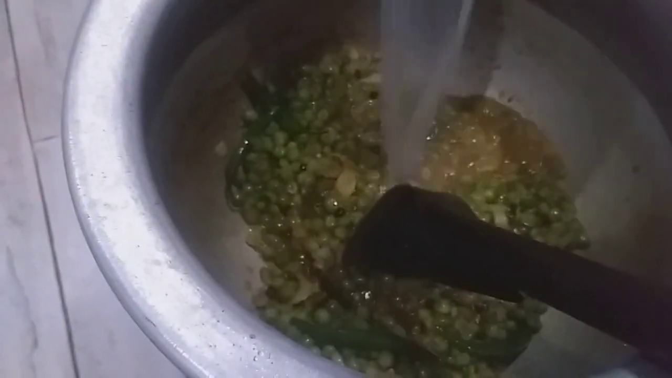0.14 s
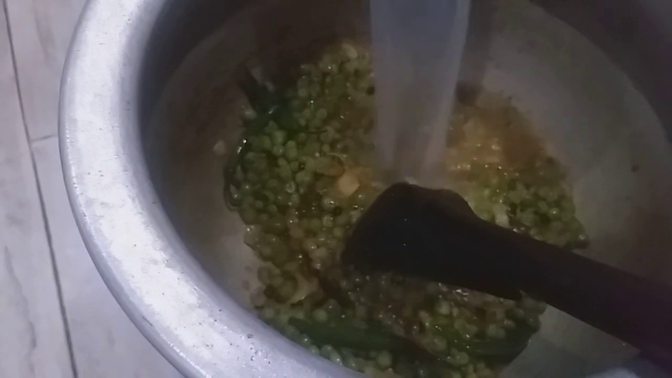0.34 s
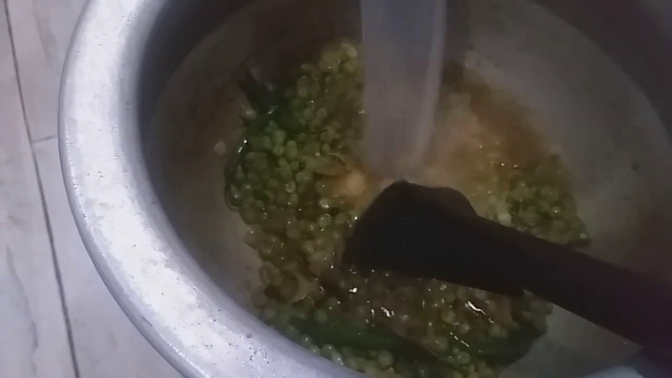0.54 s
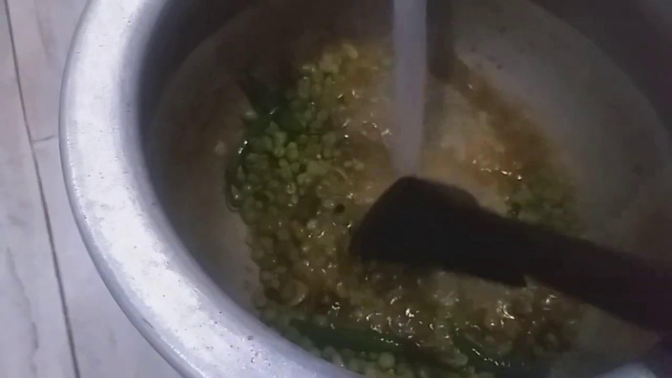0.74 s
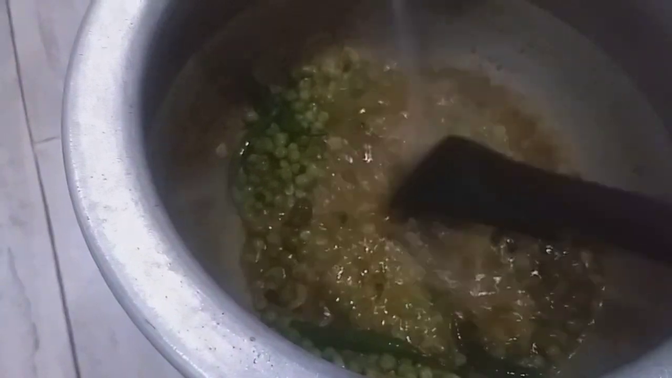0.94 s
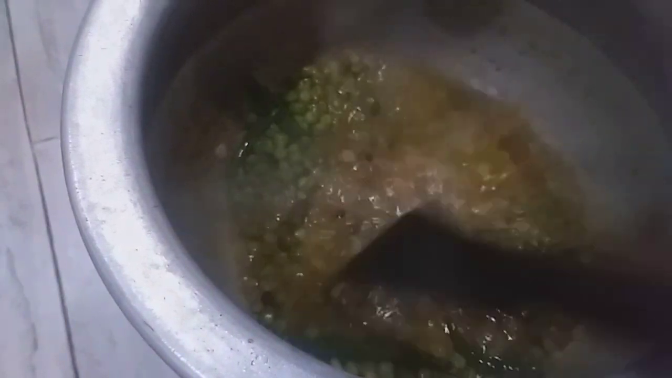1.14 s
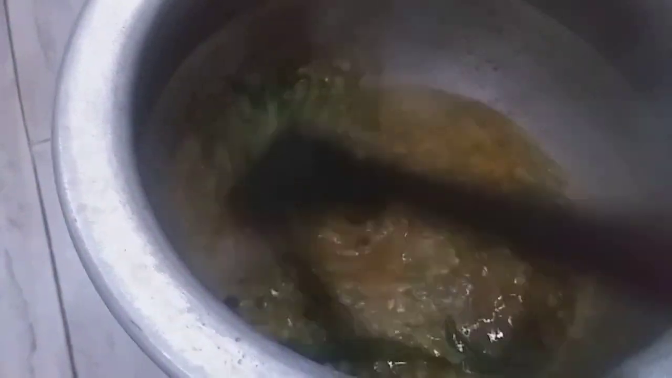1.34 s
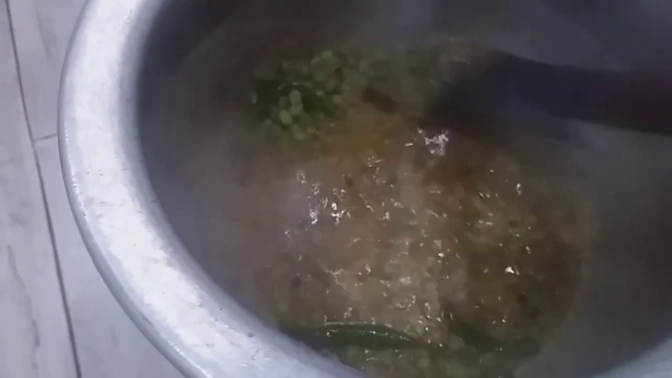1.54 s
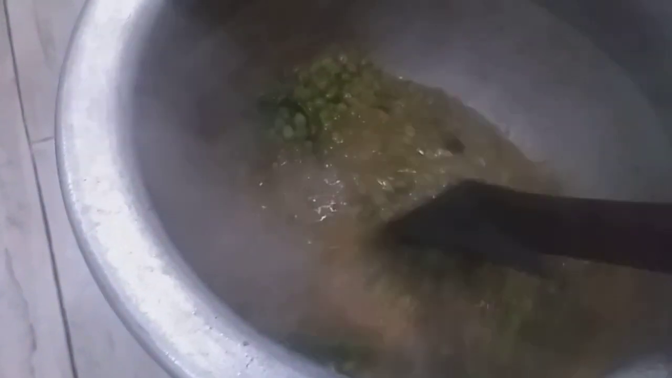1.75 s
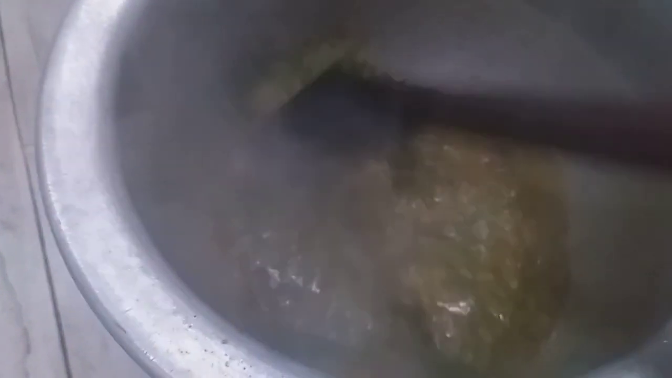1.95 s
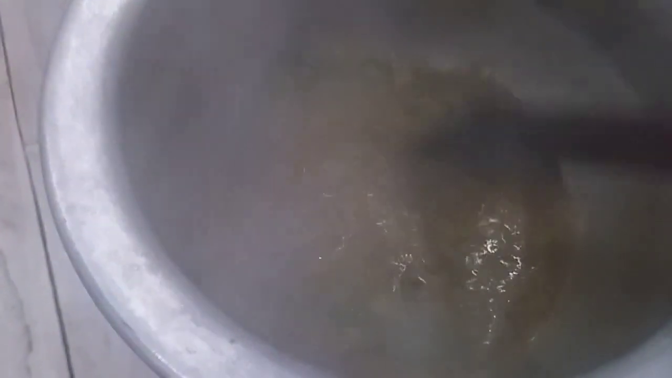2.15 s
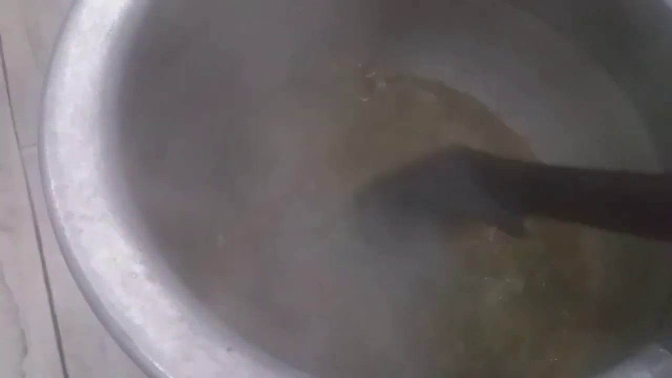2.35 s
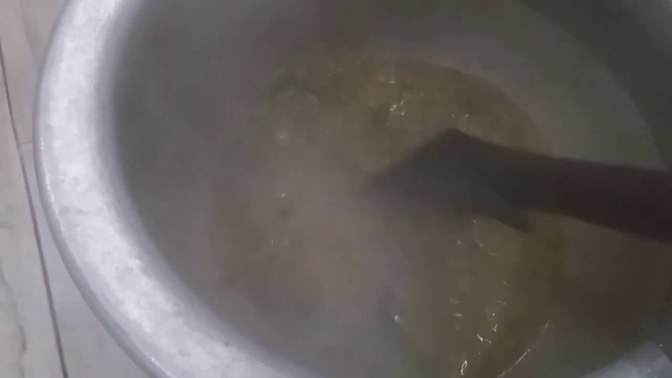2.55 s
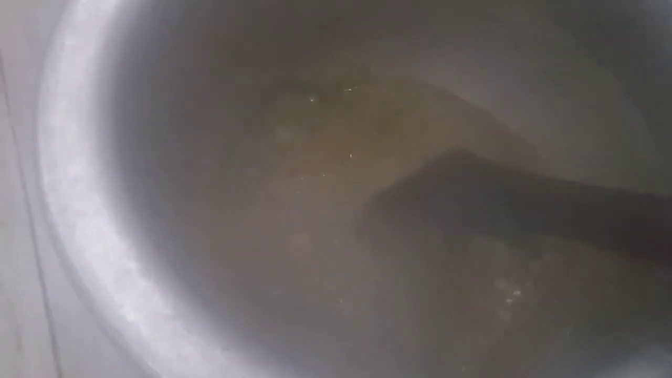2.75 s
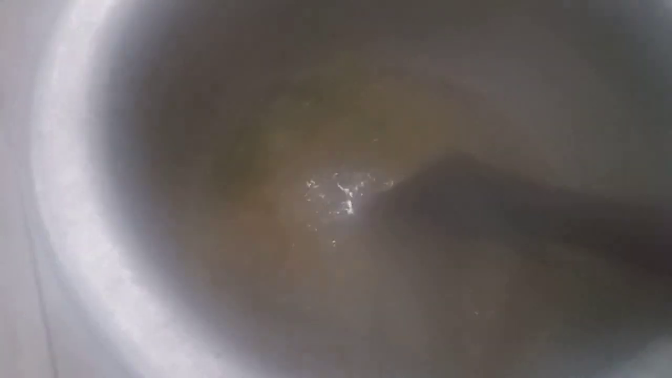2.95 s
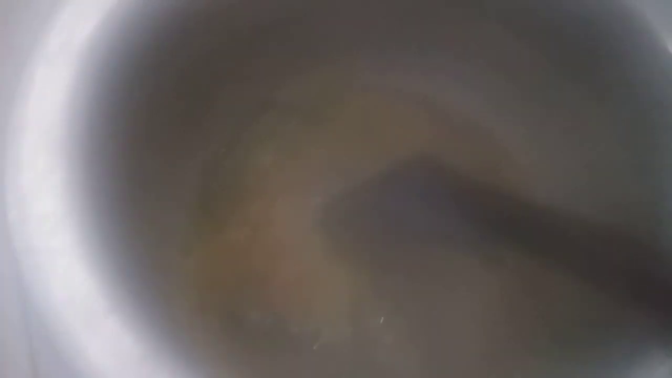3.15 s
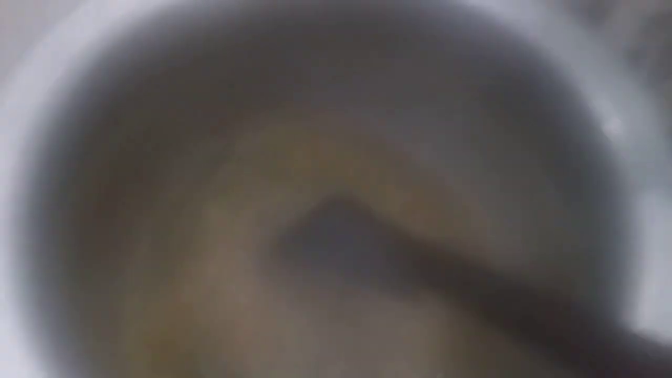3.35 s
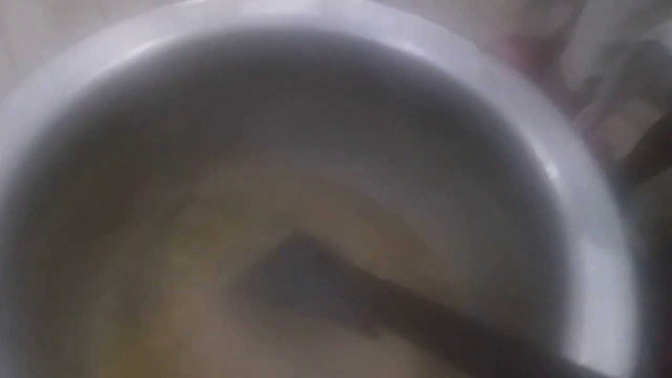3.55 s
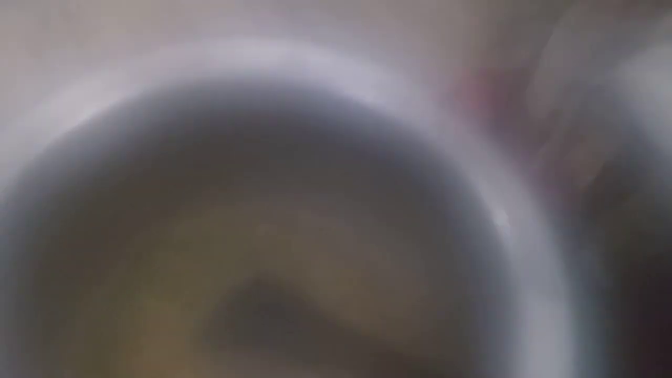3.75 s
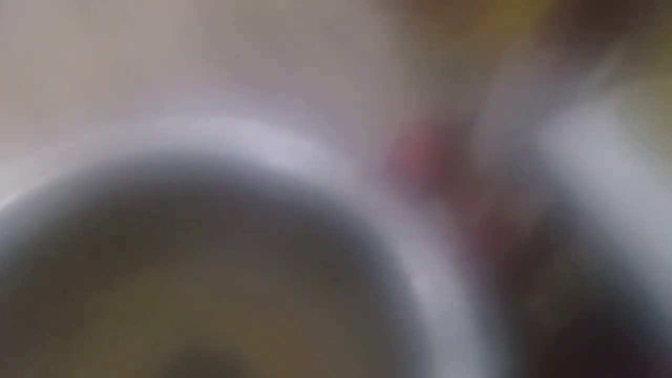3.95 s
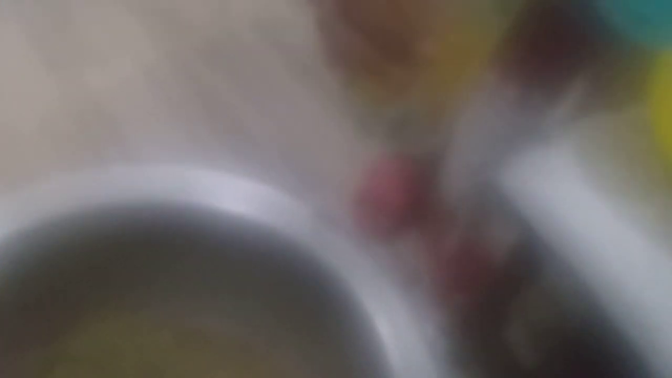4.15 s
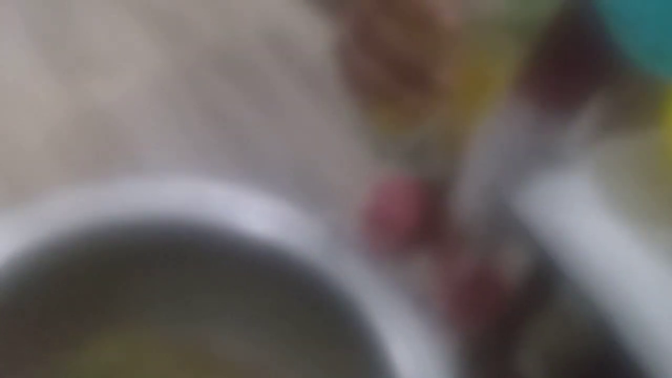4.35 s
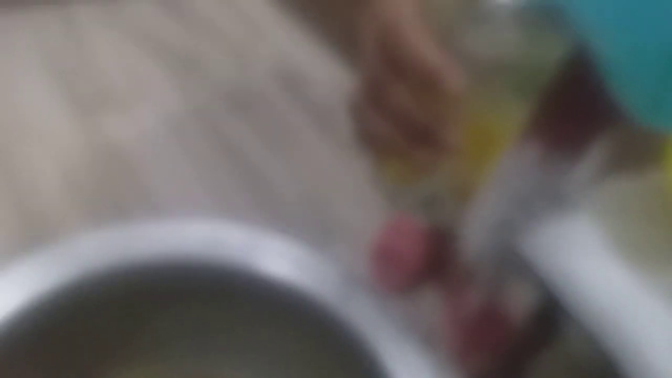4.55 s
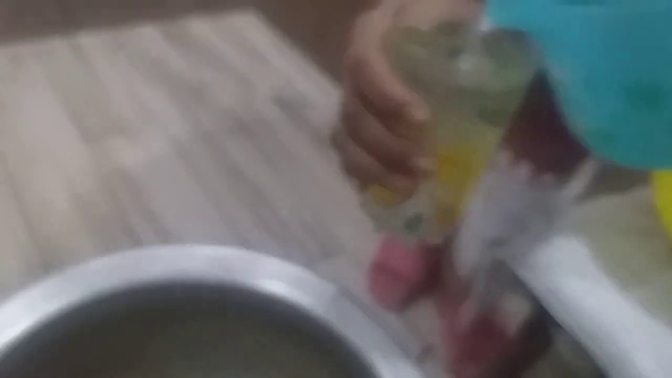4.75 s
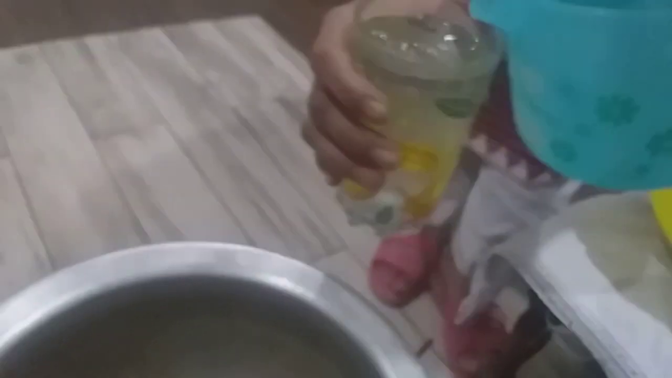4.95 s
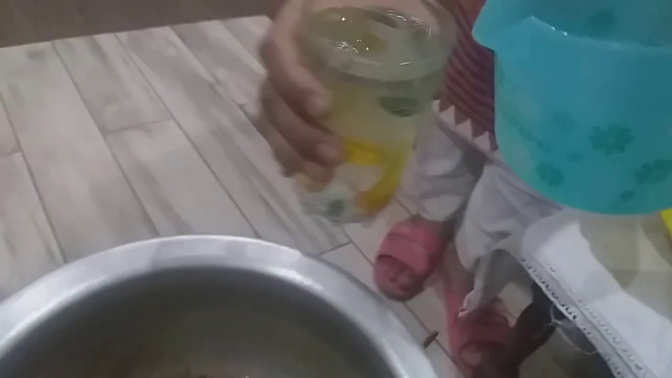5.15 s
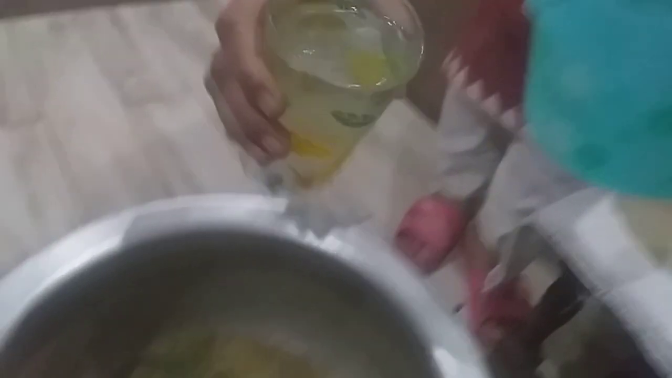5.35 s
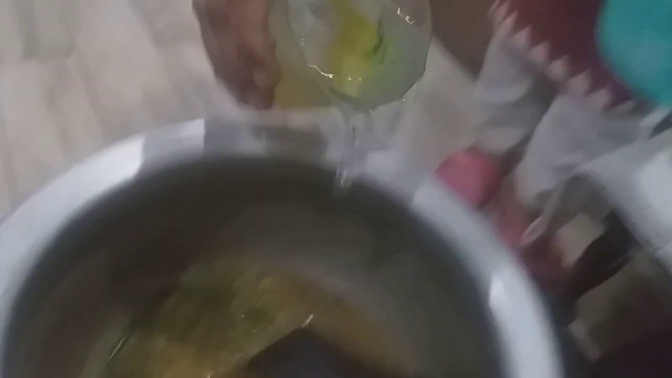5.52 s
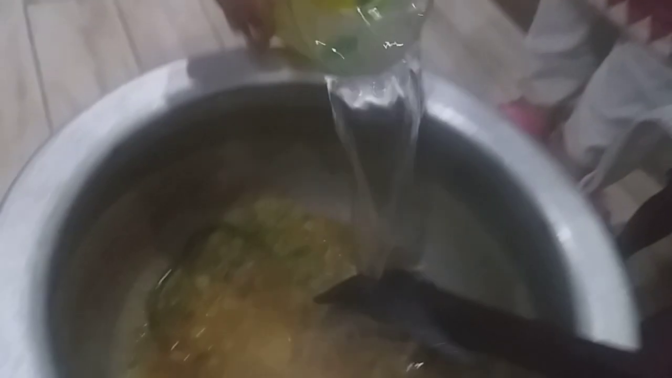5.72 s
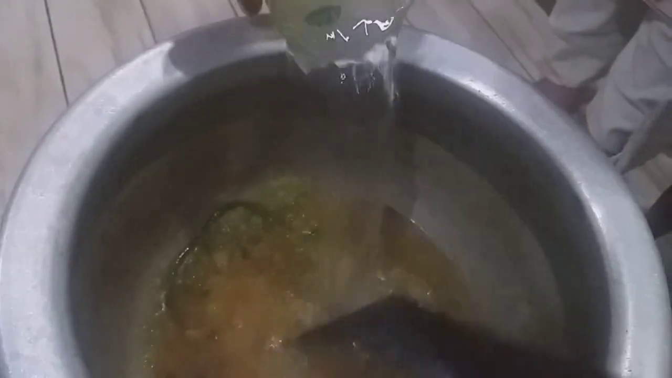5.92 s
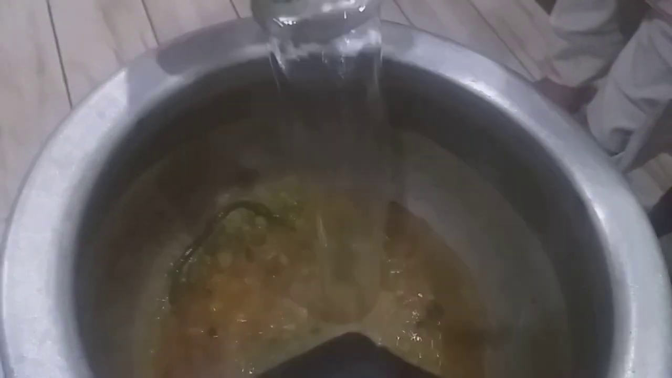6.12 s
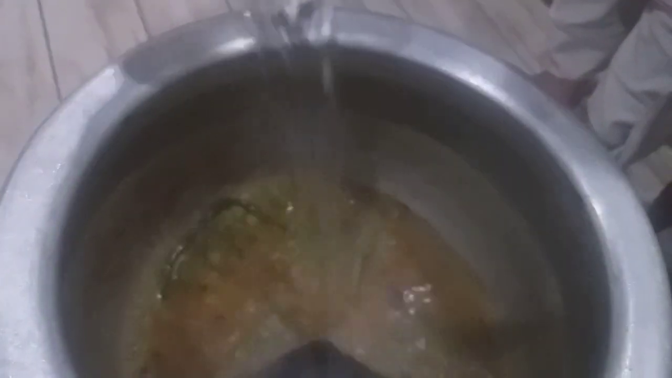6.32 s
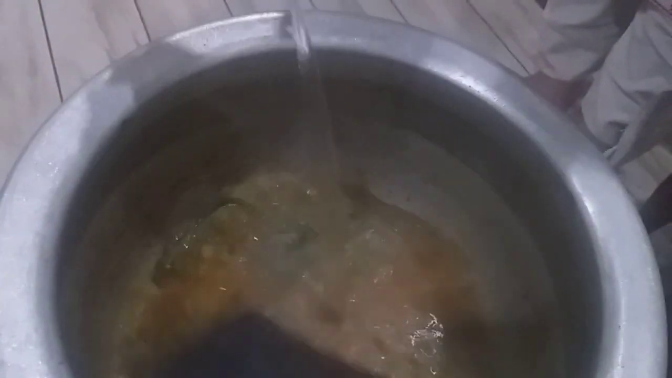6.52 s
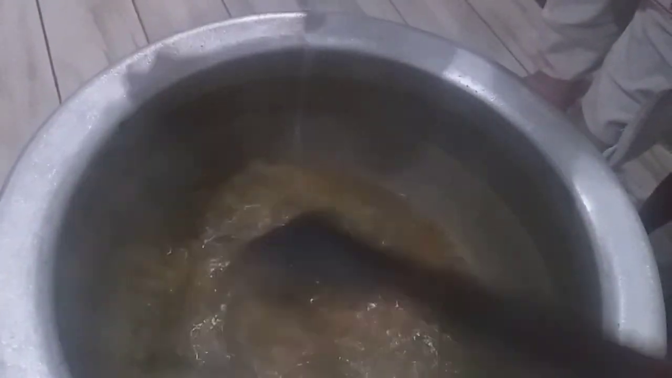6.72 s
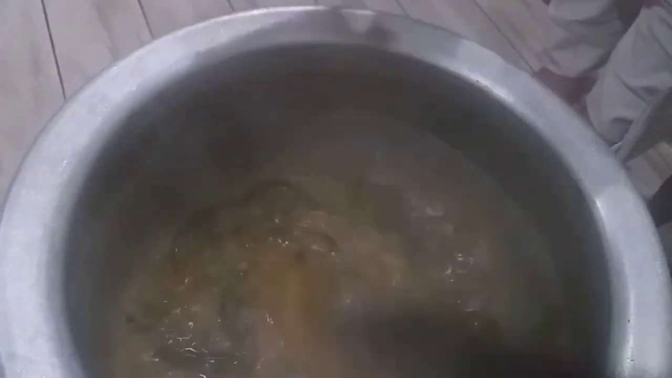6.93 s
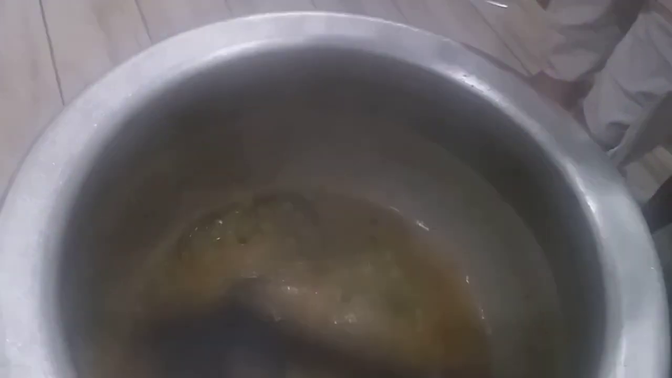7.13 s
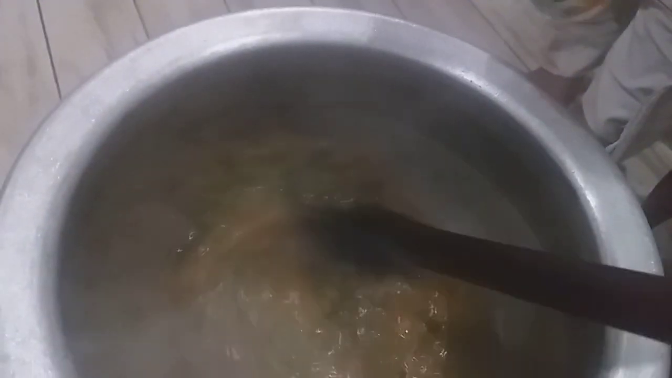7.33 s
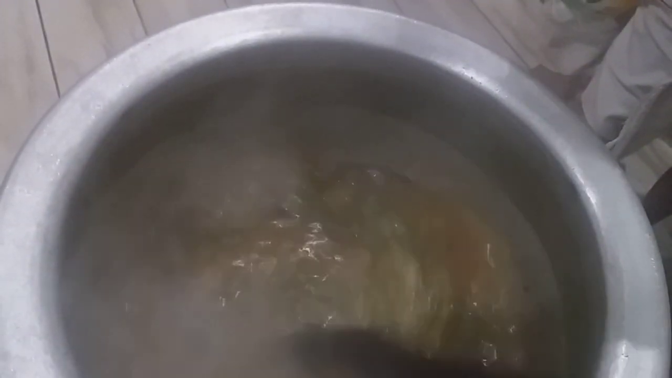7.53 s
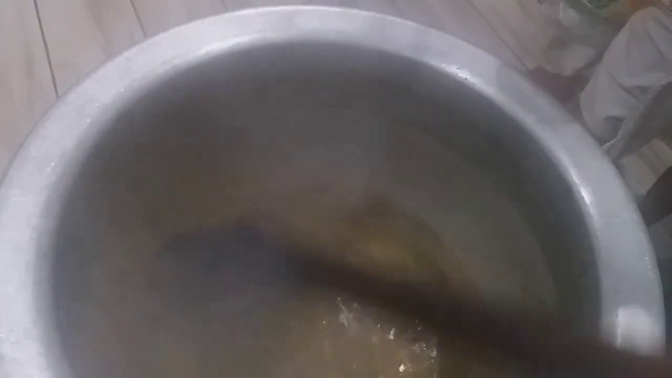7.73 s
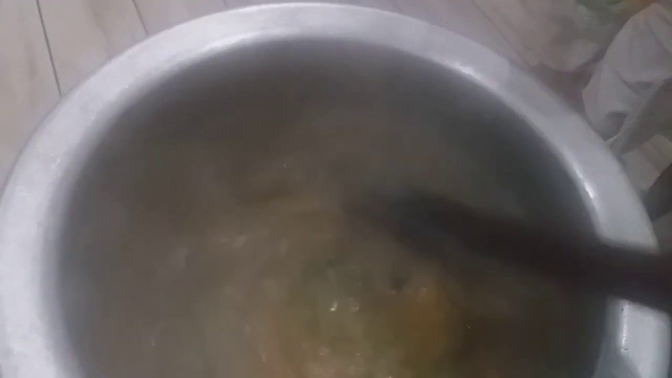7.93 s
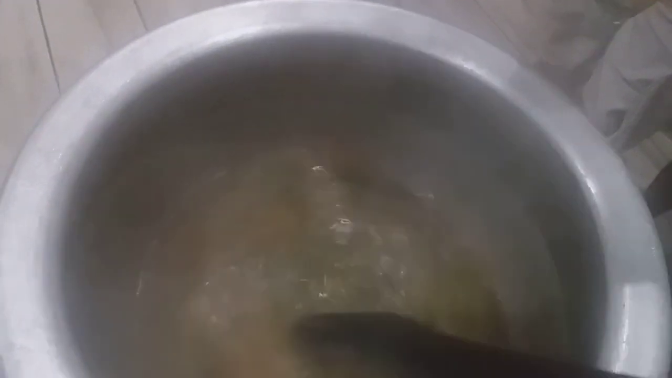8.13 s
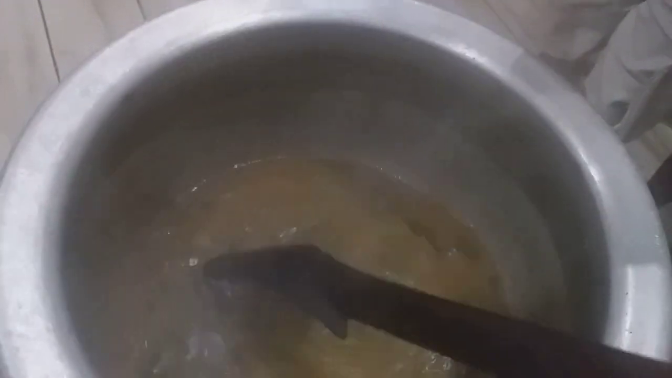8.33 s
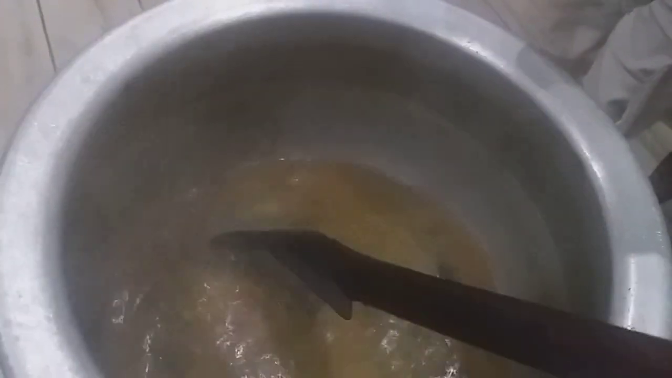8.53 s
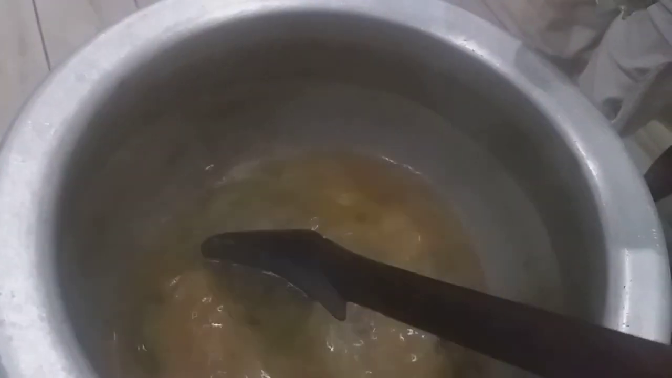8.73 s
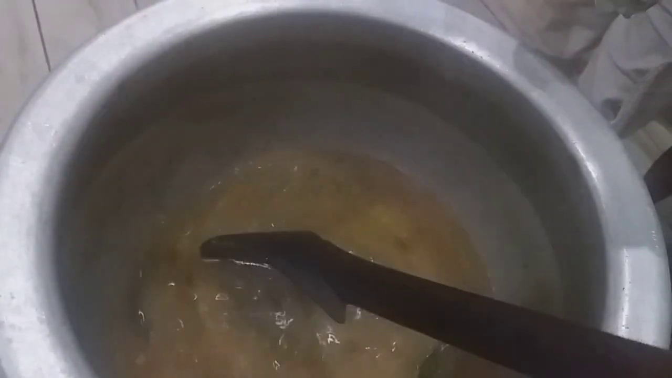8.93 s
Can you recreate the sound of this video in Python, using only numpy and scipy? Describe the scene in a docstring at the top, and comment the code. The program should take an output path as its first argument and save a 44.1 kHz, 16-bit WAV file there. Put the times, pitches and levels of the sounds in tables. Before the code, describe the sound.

Food sizzles and bubbles in a pot as a wooden spatula stirs; water pours in, and the hiss swells again, then fades.

```python
"""A bright, surging sizzle: peas and spices fry in a deep aluminium pot, stirred with a wooden spatula.
Water flashes to steam in countless tiny pops, which swell as the spatula sweeps liquid over hot metal.
One glass of water is heard only as an early peak in the boil; a second splashes in at 5.7 s.
The sauce bubbles and sloshes, the air in the pot rings, the spatula knocks and scrapes,
and a few drops plop as the sizzle dies away in a small kitchen."""
import sys
import numpy as np
from scipy import signal
from scipy.fft import rfft, irfft, next_fast_len
from scipy.io import wavfile

SR = 44100
rng = np.random.default_rng(int(sys.argv[2]) if len(sys.argv) > 2 else 0)


def log_audio(samples):
    """Write samples as a 16-bit WAV file to the path given in sys.argv[1]."""
    # one column per channel
    frames = np.atleast_2d(samples).T
    # limit to full scale, then quantise
    limited = np.clip(frames, -1, 1)
    pcm = np.round(limited * 32767).astype(np.int16)
    wavfile.write(sys.argv[1], SR, pcm)


N = 396018
TIME = np.arange(N) / SR
POUR_START_S = 5.7

# spatula strokes through the sauce: middle t/s, length/s, scrape level/dB, relative slosh level/dB
STROKES = [(.988, .085, -40, -50), (1.313, 0.13, -33, -36), (1.62, .11, -36, -42), (1.882, 0.19, -34, -34),
           (2.053, 0.07, -45, -44), (3.183, .12, -54, -41.5), (6.22, 0.14, -50, -44.5),
           (6.636, 0.072, -44, -38), (6.862, 0.17, -43.5, -46.5), (7.161, 0.063, -33, -60),
           (7.295, 0.23, -39.5, -44), (7.61, 0.22, -49, -40), (7.858, 0.11, -38, -57),
           (8.07, .18, -49, -38.5), (8.259, 0.053, -53, -44)]


def frying(sizzle_db, spray_db):
    """The harder water boils off the metal, the denser the pops and the sharper their edge."""
    # colours of the sizzle's body, its sharp edge and the finest spray: f/Hz, level/dB
    sizzle_colour = [(30, -80), (100, -53), (1200, -20.5), (2400, -6.5), (3300, -7), (3750, -3), (4100, 1),
                     (4650, 0.5), (5200, -4), (6100, -8), (6900, -15.5), (8200, -21.5), (10000, -29),
                     (16000, -55)]
    edge_colour = [(500, -60), (4500, -28), (6500, -2.5), (7600, 1.5), (9700, -12.5), (11500, -8.5),
                   (14000, -8)]
    spray_colour = [(2000, -75), (6500, -45), (9700, -39), (11000, -19), (11900, -12.5), (12900, -13),
                    (14000, -4.5), (14600, 1.2), (15200, 2), (15700, 2), (17000, -11)]
    vigour_db = sizzle_db + 30.5   # zero at a moderate sizzle
    per_s = 11000 * from_db(0.25 * vigour_db)
    # a collapse sounds across the whole treble; the finest droplets add to the top alone
    bursts = pops(per_s, spread_db=1.5, clump_db=0.55)
    droplets = pops(per_s, spread_db=2.5, clump_db=1.14)
    sizzle = rms_one(coloured(bursts, sizzle_colour))
    sizzle *= from_db(sizzle_db - 0.46 + 0.5 * drift(40))
    edge = rms_one(coloured(bursts + 1.5 * droplets, edge_colour))
    edge *= from_db(sizzle_db - 21 + 0.17 * vigour_db)
    spray = rms_one(coloured(bursts + 0.74 * droplets, spray_colour))
    spray *= from_db(spray_db + 0.4 + 0.7 * drift(35))
    return sizzle + edge + spray


def boil():
    """Envelopes in dB of sizzle, spray and bubbling: surges and spurts add their power to the simmer."""
    # the boil peaks after the first glass and dies as the metal cools:
    # t/s, sizzle level/dB, spray level/dB, bubbling level/dB
    simmer = [(0, -30, -28, -36), (.3, -29, -26.5, -35.5), (.62, -28.5, -28, -36), (1.4, -22.5, -19, -29.5),
              (1.8, -24, -22, -31), (2.07, -23.5, -19.5, -32), (2.38, -29, -27, -34),
              (2.8, -35.5, -34, -38), (3.45, -40, -41, -40), (4.5, -43, -46.5, -44),
              (5.65, -43, -45.5, -44), (6.5, -35, -40, -39.5), (8.2, -43.5, -40.5, -48.5),
              (8.98, -55.5, -52, -62.5)]
    # water reaches bare hot metal, poured or pushed by the spatula:
    # t/s, sizzle level/dB, spray level/dB, bubbling level/dB, rise/s, hold/s, sizzle fade/(dB/s)
    surges = [(2.395, -31, -31, -40, 0.055, 0.066, 70), (5.682, -31, -27.5, -40, 0.18, 0.28, 34),
              (6.54, -23.5, -20.5, -37.5, .14, 0.066, 51), (7.051, -21, -17.5, -33.5, 0.2, .03, 50),
              (7.529, -35.5, -31.5, -45, 0.038, 0.025, 26), (7.701, -24.5, -22, -38, 0.087, .02, 52)]
    # oil spits, sudden spurts of steam that die at once: t/s, level/dB
    spurts = [(.414, -23.5), (.469, -24.5), (.521, -23), (.56, -23), (1.21, -29), (1.868, -22.5)]
    spray_lag_s, spurt_t60_s = 0.029, 0.094
    sizzle, spray, bubbling = from_db(in_time(simmer)) ** 2
    # a surge climbs as the wet patch spreads; the spray peaks later, the sauce bubbles on longer
    for s, sizzle_db, spray_db, bubbling_db, rise, hold, fade in surges:
        sizzle += (from_db(sizzle_db) * swell(s, rise, hold, fade, climb_db=6)) ** 2
        spray += (from_db(spray_db) * swell(s, rise + spray_lag_s, hold, fade, climb_db=12)) ** 2
        bubbling += (from_db(bubbling_db) * swell(s, rise, hold, 0.49 * fade, climb_db=3)) ** 2
    spitting = sum(from_db(db - 60 * np.abs(TIME - s) / spurt_t60_s) * (TIME > s) for s, db in spurts)
    return 10 * np.log10([sizzle + spitting ** 2, spray + 0.7 * spitting ** 2, bubbling])


def sauce(bubbling_db):
    """Steam bubbles burst through the sauce, which heaves with the boil and slops at every stroke."""
    # colours of the bursting bubbles and the low slosh: f/Hz, level/dB
    bubbling_colour = [(60, -39), (110, -19), (220, -21), (400, -3.5), (700, -6), (1250, -5.5),
                       (1700, -1.5), (2400, -2.5), (3100, -1), (4200, 0), (6000, -12), (9000, -38)]
    sloshing_colour = [(25, -60), (50, -38), (85, -20.5), (160, -5), (220, -1.5), (300, 3), (420, -5),
                       (650, -8), (1000, -25), (2000, -47)]
    vigour_db = bubbling_db + 34.5   # zero at a moderate boil
    heave = from_db(-46.5 + 1.32 * vigour_db)
    pushed = sum(from_db(slosh_db) * hump(s, length) for s, length, _, slosh_db in STROKES)
    bubbling = rms_one(in_pot(coloured(pops(4200, spread_db=1.5, clump_db=0.43), bubbling_colour)))
    sloshing = rms_one(in_pot(coloured(pops(900, spread_db=1.5, clump_db=1.0), sloshing_colour)))
    return bubbling * from_db(bubbling_db + 0.79) + sloshing * np.hypot(heave, pushed) * from_db(-3)


def pour():
    """The stream patters into the sauce and digs a hollow whose ring rises as the pot fills."""
    # resonances of the hollow as the pour begins: f/Hz, width/Hz, boost/dB
    hollow = [(436, 49, 6.5), (896, 19, 22.5), (1770, 46, 22)]
    # colour of the patter: f/Hz, level/dB
    patter_colour = [(100, -17), (400, 0.5), (900, -3), (2000, -12), (4000, -11), (9000, -38)]
    octaves_per_s = 0.083
    patter = coloured(pops(1500, spread_db=2.0, clump_db=3.0), patter_colour)
    speed = 2 ** (octaves_per_s * np.maximum(TIME - POUR_START_S, 0))
    ringing = np.interp(np.cumsum(speed) / SR, TIME, rms_one(resonate(patter, hollow)))
    return ringing * from_db(-42) * swell(POUR_START_S, rise=0.03, hold=0.49, fade_db_per_s=46)


def slaps():
    """Water hits the surface of the sauce in short, broad splats."""
    # impacts of the water: t/s, level/dB
    splats = [(5.712, -31), (5.732, -22), (5.751, -37), (5.769, -37), (5.782, -40), (8.558, -45)]
    band_hz, t60_s = [1400, 5000], 0.015
    out, t = np.zeros(N), TIME[:SR // 16]
    band = signal.butter(2, band_hz, "band", fs=SR, output="sos")
    for s, db in splats:
        noise = rms_one(signal.sosfilt(band, rng.standard_normal(len(t))))
        add(out, s, from_db(db - 60 * t / t60_s) * noise)
    return out


def drops():
    """A trapped bubble rings, and its pitch glides as it nears the surface."""
    # air gulped under the spatula, drops and splashes:
    # t/s, relative level/dB, starting f/Hz, glide/(octaves/s), t60/s
    bubbles = [(1.25, -32, 345, 3, .08), (1.29, -29.5, 331, 3.5, 0.13), (1.889, -34, 338, 8, 0.042),
               (2.059, -34.5, 290, 6, 0.12), (2.79, -28, 1027, -9, 0.045), (2.822, -37.5, 860, -5, 0.056),
               (3.204, -31, 1120, 4, 0.042), (5.711, -19, 1640, 40, 0.015), (5.73, -11, 1630, 1, 0.012),
               (5.733, -11, 2240, 1, 0.014), (5.749, -5, 3720, 58, 0.0088), (5.768, -12, 3780, 25, 0.012),
               (5.782, 7, 2970, 150, 0.0046), (7.308, -32, 350, 9, 0.065), (7.587, -28, 320, 6.5, 0.074),
               (7.962, -30, 350, 14.5, .07), (8.207, -33, 2100, -1, 0.026), (8.426, -38, 2200, -4, 0.038),
               (8.508, -33, 2200, 3, 0.03), (8.558, -25.5, 2470, 85, 0.027),
               (8.595, -21.5, 855, -5.5, 0.034)]
    out, t = np.zeros(N), TIME[:SR // 8]
    onset = (1 - np.exp(-t / 0.0028)) ** 2
    for s, db, start_hz, glide, t60 in bubbles:
        hz = start_hz * 2 ** (glide * np.minimum(t, t60 / 2))
        envelope = from_db(db + 7.5 - 60 * t / t60) * onset
        add(out, s, envelope * np.sin(2 * np.pi * np.cumsum(hz) / SR))
    return out


def spatula_knocks():
    """Wood on metal damped by food: each spot sounds the modes near its own pitch best."""
    # knocks against the pot: t/s, level/dB, f/Hz favoured by the spot struck
    knocks = [(1.802, -26, 415), (1.85, -25.5, 300), (2.014, -22.5, 217), (3.061, -21.5, 564),
              (3.071, -18, 348), (5.575, -20.5, 1100), (5.596, -22, 845), (6.627, -22, 240),
              (7.909, -26, 290)]
    # modes of the spatula and loaded pot: f/Hz, level/dB, t60/s
    modes = [(190, -11, 0.037), (354.6, -6, 0.12), (448.6, -6.5, 0.25), (605, -14.5, 0.044),
             (722, -19.5, 0.087), (1009, -9, 0.062), (1190, -33, .03), (1900, -11, 0.045)]
    out, t = np.zeros(N), TIME[:SR // 4]
    hz, mode_db, t60 = np.transpose(modes)[:, :, None]
    ringing = from_db(-60 * t / t60) * np.sin(2 * np.pi * hz * t)
    for s, db, spot_hz in knocks:
        detuning = hz / spot_hz - spot_hz / hz
        strength = from_db(db + mode_db + rng.standard_normal(hz.shape)) / np.hypot(1, detuning)
        add(out, s, (strength * ringing).sum(axis=0))
    # the pot is too small to radiate deep bass
    return signal.sosfilt(signal.butter(3, 190, "high", fs=SR, output="sos"), out)


def scraping():
    """Each stroke drags wood over gritty spice: a short swell of tiny slips inside the pot."""
    # colour of the scrape: f/Hz, level/dB
    scrape_colour = [(200, -26), (600, -20), (1000, 0), (1250, -4), (1750, 8), (2200, -19), (4000, -21),
                     (8000, -50)]
    envelope = sum(from_db(scrape_db) * hump(s, length) for s, length, scrape_db, _ in STROKES)
    slips = coloured(pops(2200, spread_db=3.0, clump_db=3.0), scrape_colour)
    return envelope * rms_one(in_pot(slips))


def plinks(bubbling_db):
    """Stray bubbles ring briefly, at random moments and pitches, louder in a harder boil."""
    per_s, low_hz, high_hz, t60_s = 20, 1408, 4280, 0.03
    out, t = np.zeros(N), TIME[:SR // 16]
    for when, pitch, strength in rng.random((int(per_s * N / SR), 3)):
        hz = low_hz * (high_hz / low_hz) ** pitch
        envelope = from_db(-3.5 + 5 * strength - 60 * t / t60_s)
        add(out, when * TIME[-1], envelope * np.sin(2 * np.pi * hz * t))
    return out * from_db(bubbling_db)


def in_pot(x):
    """The air in the pot rings along; its resonances change as the water rises."""
    # air resonances before and after the pour: f/Hz, width/Hz, boost/dB
    air_before = [(368.7, 46, 11.5), (447, 27, 8.5), (989, 75, 12.5), (1535, 53, 9), (1880, 180, 5),
                  (2120, 100, 5), (2260, 100, 3.5), (2640, 160, 4.5)]
    air_after = [(366, 86, 11), (445, 24, 7), (985, 65, 16.5), (1479, 30, 13.5), (1780, 150, 6),
                 (2025, 63, 10.5), (2460, 150, 7), (3200, 110, 1)]
    fill_s = 0.64
    fill = np.clip((TIME - POUR_START_S) / fill_s, 0, 1)
    return (1 - fill) * resonate(x, air_before) + fill * resonate(x, air_after)


def kitchen():
    """Faint, steady room tone: a low rumble with a thin hiss on top."""
    # colour of the room tone: f/Hz, level/dB
    room_colour = [(20, -30), (55, -4), (110, 8), (200, 3), (600, -24), (2000, -6), (4500, -21),
                   (7000, -18), (9700, -46), (15000, 2.5)]
    return from_db(-54.5) * rms_one(coloured(rng.standard_normal(N), room_colour))


def reverberate(x, t60, wet_db):
    """Direct sound plus a diffuse tail that starts with the nearest surfaces."""
    t = TIME[:SR // 2]
    tail = rng.standard_normal(len(t)) * from_db(-60 * t / t60) * (t > 0.006)
    return x + from_db(wet_db) * signal.fftconvolve(x, tail / np.linalg.norm(tail))[:N]


def pops(per_s, spread_db, clump_db):
    """Clicks at random moments, mostly small, a few large, swelling in clumps."""
    born = rng.random(N) < per_s / SR
    sizes = from_db(spread_db * np.minimum(rng.exponential(1, N), 5))
    signs = rng.choice([-1, 1], N)
    return born * sizes * signs * from_db(clump_db * drift(110)) / np.sqrt(per_s)


def coloured(x, spectrum):
    """Equalise a sound with a curve of f/Hz, level/dB."""
    hz, db = np.transpose(spectrum)
    size = next_fast_len(N)
    bins_hz = np.maximum(np.fft.rfftfreq(size, 1 / SR), 1)
    gain = from_db(np.interp(np.log(bins_hz), np.log(hz), db))
    return irfft(rfft(x, size) * gain, size)[:N]


def resonate(x, peaks):
    """Each resonance lifts a narrow band and rings on."""
    for hz, width, db in peaks:
        x = x + (from_db(db) - 1) * signal.lfilter(*signal.iirpeak(hz, hz / width, fs=SR), x)
    return x


def swell(start, rise, hold, fade_db_per_s, climb_db=0):
    """Gain that catches quickly, climbs to 1, holds, then fades at a steady rate."""
    age, catch_s = TIME - start, 0.038
    to_climb_db = climb_db * np.clip(1 - age / rise, 0, 1)
    faded_db = fade_db_per_s * np.maximum(age - rise - hold, 0)
    return np.clip(age / catch_s, 0, 1) * from_db(-to_climb_db - faded_db)


def hump(middle, length):
    """Gain that comes and goes smoothly around a moment."""
    return np.exp(-2 * ((TIME - middle) / length) ** 2)


def drift(per_s):
    """Random wander of unit power, heading for a new value per_s times a second."""
    knots = rng.standard_normal(4000)
    return rms_one(np.interp(TIME * per_s, np.arange(len(knots)), knots))


def in_time(rows):
    """Each column of a breakpoint envelope at every sample."""
    s, *columns = np.transpose(rows)
    return [np.interp(TIME, s, column) for column in columns]


def add(out, s, sound):
    """Lay a sound in at time s."""
    at = round(s * SR)
    out[at:at + len(sound)] += sound[:N - at]


def from_db(db):
    """Decibels to gain."""
    return 10 ** (np.asarray(db) / 20)


def rms_one(x):
    """Scale to unit power."""
    return x / np.sqrt(np.mean(x ** 2) + 1e-20)


def scene():
    """The pot close by in a small kitchen, heard almost alike on both sides."""
    # slight lean to the left: f/Hz, side level against mid/dB
    lean = [(1000, -90), (1400, -29), (1730, -13), (2200, -15), (2750, -31), (3500, -76)]
    sizzle_db, spray_db, bubbling_db = boil()
    cooking = frying(sizzle_db, spray_db) + sauce(bubbling_db) + scraping() + pour()
    cooking = reverberate(cooking, t60=0.12, wet_db=-16)
    hits = spatula_knocks() + drops() + slaps() + plinks(bubbling_db)
    # the open pot throws sound upward and the room sends it back
    echo_s, echo_db = 0.0195, -13
    echo = from_db(echo_db) * np.interp(TIME - echo_s, TIME, hits)
    hits = reverberate(hits + echo, t60=0.61, wet_db=-7.5)
    mid = cooking + hits + kitchen()
    side = coloured(mid, lean)
    return np.array([mid + side, mid - side])


def record(dry):
    """A steep low-pass cuts the very top."""
    bins_hz, cutoff_hz = np.fft.rfftfreq(N, 1 / SR), 15750
    return irfft(rfft(dry) / np.hypot(1, (bins_hz / cutoff_hz) ** 500), N)


dry = scene()
out = record(dry)
log_audio(out)
```